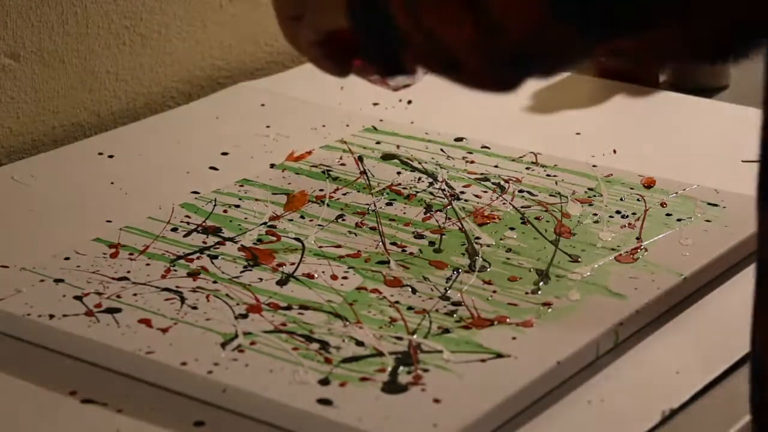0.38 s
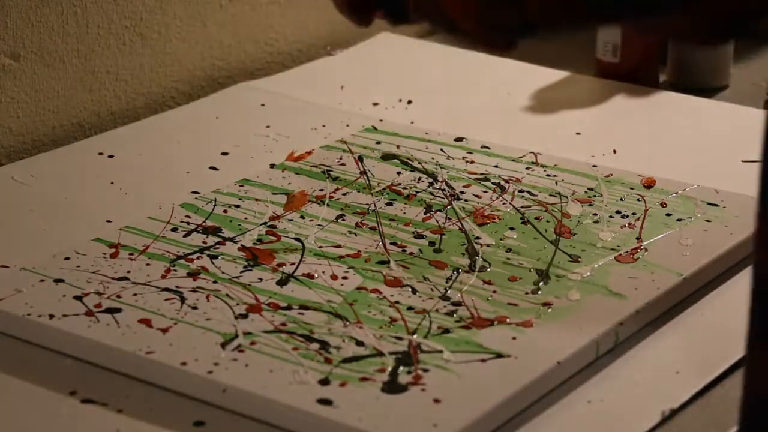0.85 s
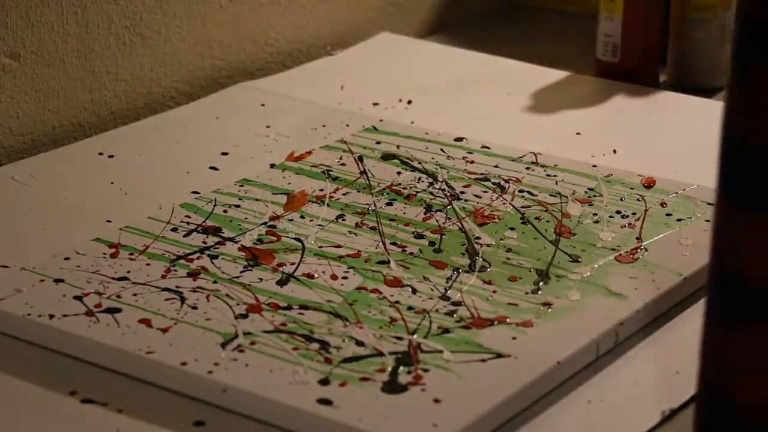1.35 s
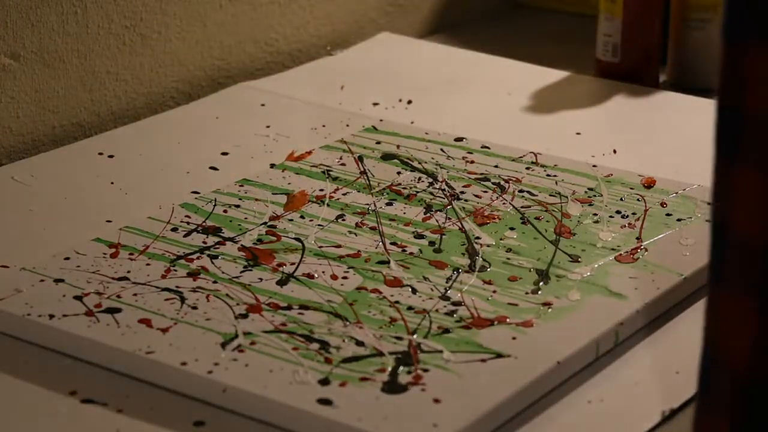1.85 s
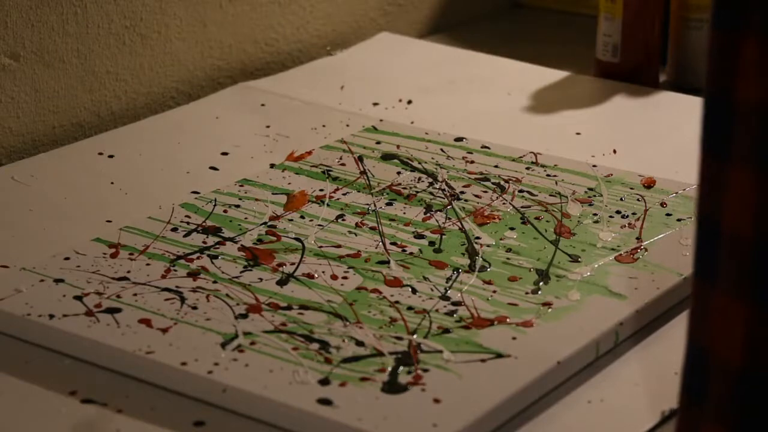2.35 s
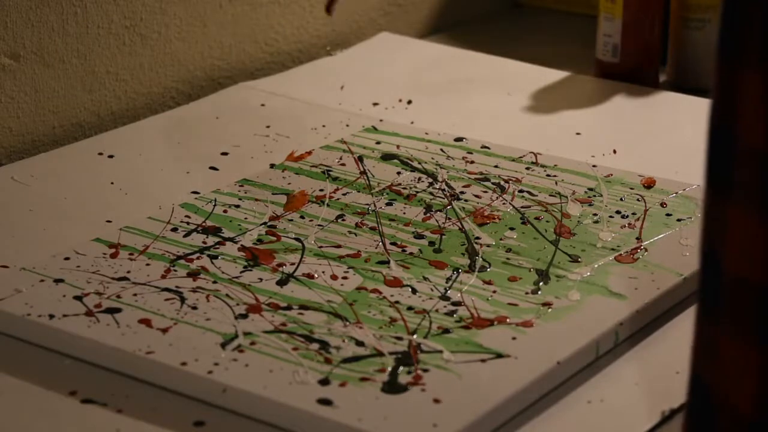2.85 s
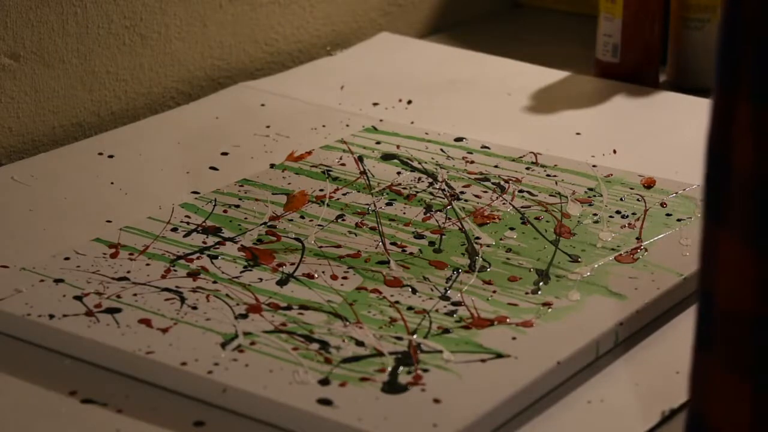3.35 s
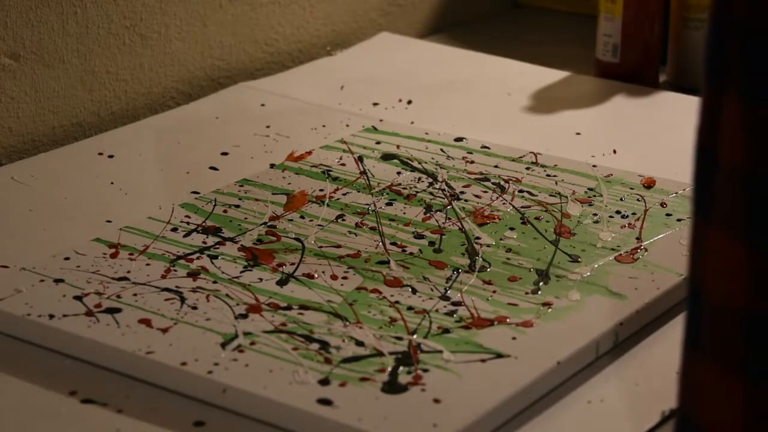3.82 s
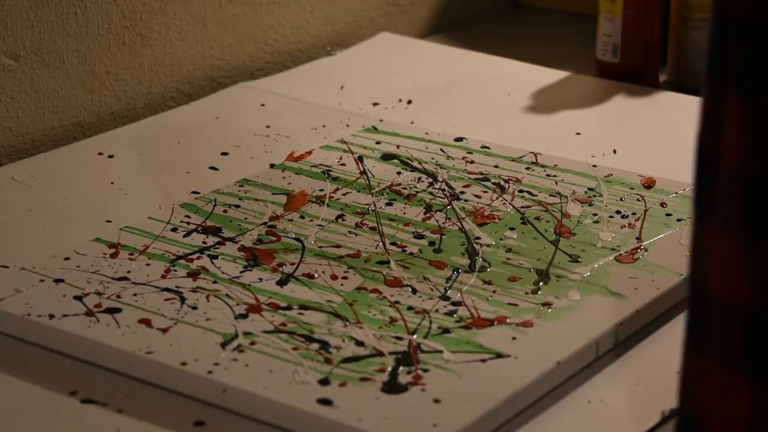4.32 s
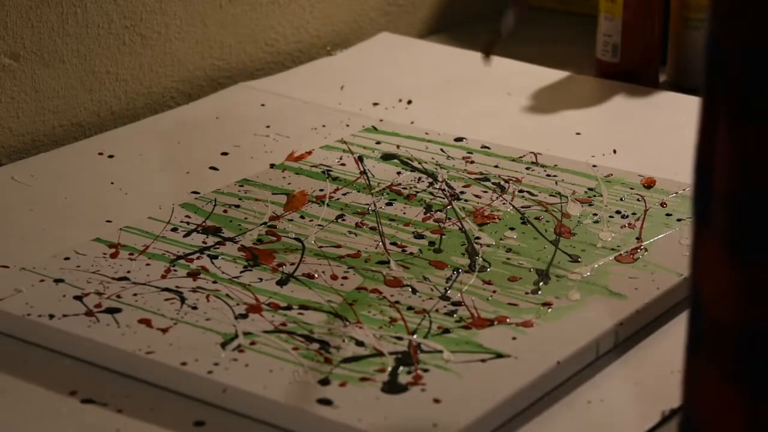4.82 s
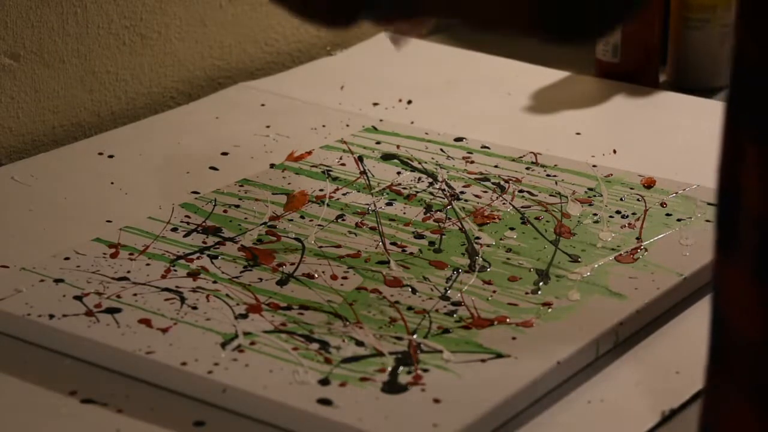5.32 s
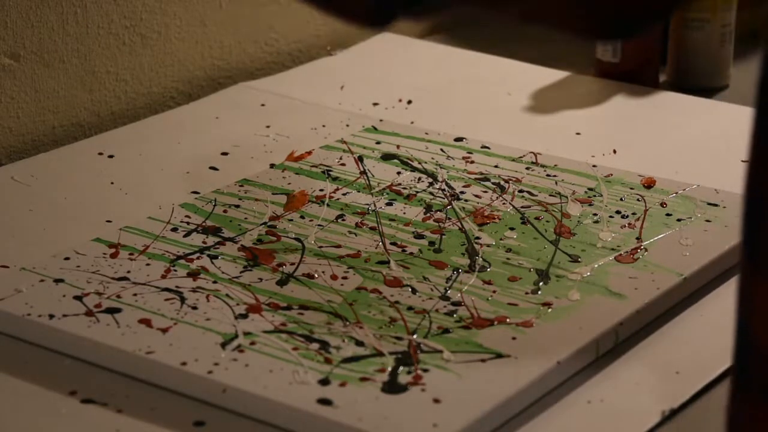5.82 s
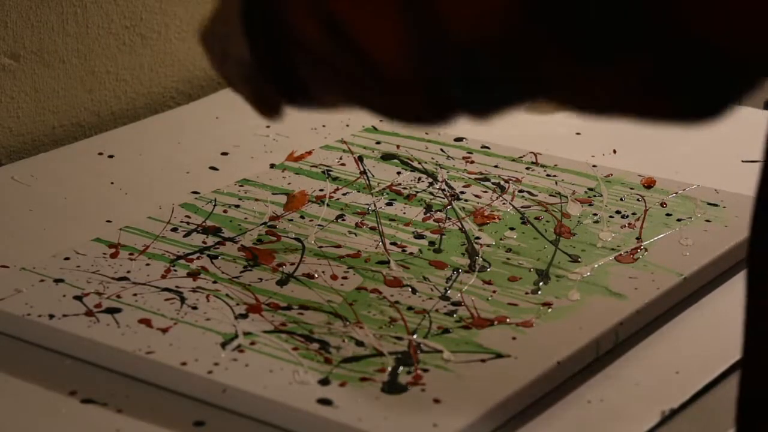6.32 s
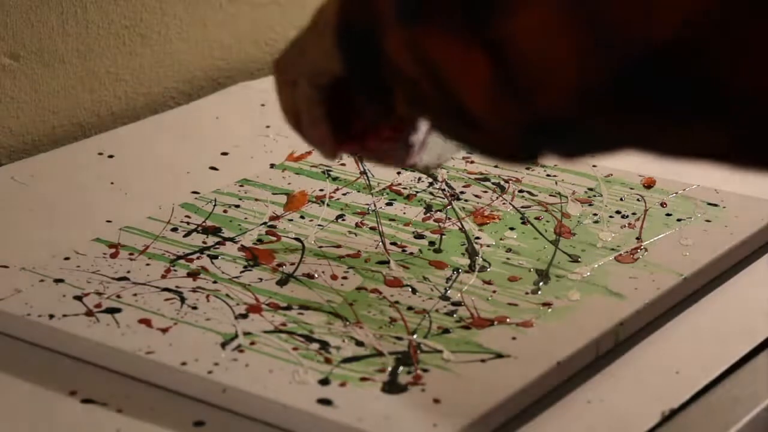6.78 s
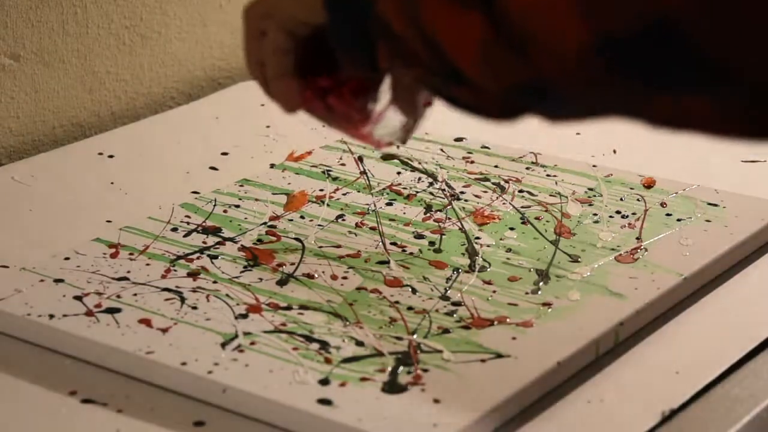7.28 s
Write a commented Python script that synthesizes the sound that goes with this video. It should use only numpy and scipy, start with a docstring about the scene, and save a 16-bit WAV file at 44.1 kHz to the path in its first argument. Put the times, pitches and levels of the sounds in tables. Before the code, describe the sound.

Light hollow plastic knocks and gritty scuffs come in clusters as bottles are handled on a tabletop, quiet gaps between, soft room air underneath.

```python
"""Plastic paint bottles and a stirring stick are picked up, knocked, twisted and slid on a table in a small quiet room.
Each contact rings the bottle walls, caps, hollow air and table top; rubbing is a dense stream of tiny contacts.
A short noise tail makes the room. Shaped noise makes room air, resonant noise a faint whirr and a low hum,
and one wavering sine a thin whistle."""
import sys
import numpy as np
from scipy import signal
from scipy.fft import rfft, irfft
from scipy.io import wavfile

SR = 44100
rng = np.random.default_rng(int(sys.argv[2]) if len(sys.argv) > 2 else 0)


def undo_db(level):
    """Turn decibels back into plain size, where 20 dB means ten times bigger."""
    steps = np.asarray(level, float) / 20
    return 10 ** steps


def file_out(sig):
    """Save sig as 16-bit WAV at sys.argv[1]."""
    # one column per channel
    cols = np.atleast_2d(sig).T
    # limit, then scale
    lim = np.clip(cols, -1, 1)
    pcm = np.round(lim * 32767).astype(np.int16)
    wavfile.write(sys.argv[1], SR, pcm)


N = 337806

# Steady room air spectrum. Each row: frequency in Hz, relative density in dB per Hz.
AIR_SPECTRUM = [(12, -68), (20, -20), (61, -9.5), (210, -1.5), (310, -6.5), (347, -6.5), (802, -7.5),
                (873, -8.5), (1030, -7.5), (1530, -10.5), (2260, -11), (11100, -23), (16000, -31.5)]
AIR_RMS_DB = -58.5

# Resonances of whirr and hum. Each row: frequency in Hz, width in Hz, relative level in dB.
WHIRR_MODES = [(1992, 56, -3.5), (2262, 14.6, 8.5), (2455, 41, -0.5), (2630, 150, -4.5), (2843, 37, -0.5),
               (3174, 37, -0.5)]
HUM_MODES = [(272, 24, 0), (303, 16, 1)]
# Levels of whirr and hum over time. Each row: time in seconds, rms level in dB.
WHIRR_LEVEL_DB = [(0, -62), (.6, -62.5), (2.1, -65.5), (2.4, -63), (3.3, -65.5), (4.05, -62), (4.45, -68.5),
                  (7.66, -69.5)]
HUM_LEVEL_DB = [(0, -73.5), (2.1, -74), (2.4, -76), (3.3, -71.5), (4.05, -76), (4.5, -71.5), (5.8, -69.5),
                (7.0, -64.5), (7.3, -61), (7.66, -61.5)]

# Resonances of bottle wall, shoulder and cap, hollow air and its neighbours, bright plastic edge, table top.
# Each row: frequency in Hz, width in Hz, relative level in dB.
WALL_MODES = [(1074, 195, -3), (1480, 250, -1.5), (1764, 154, 3.5), (1960, 246, 0.5), (2200, 130, 2),
              (2462, 172, 1), (2721, 130, -2), (2970, 75, -2.5)]
CAP_MODES = [(3460, 244, -4.5), (3844, 205, -2.5), (4196, 170, -1), (4410, 190, -2.5), (4753, 144, -3),
             (5150, 170, -3.5)]
HOLLOW_MODES = [(634, 177, -9.5), (729, 80, -1.5), (801.7, 37.4, 4), (931, 36, -2.5)]
TREBLE_MODES = [(5860, 790, -2), (6970, 770, 0.5), (8310, 2150, -3), (10170, 990, -2), (10940, 1500, -7.5),
                (13800, 2200, -14)]
TABLE_MODES = [(264, 123, -10), (336, 30, -3), (422, 93, 2), (490, 158, 2.5)]

# Scuffs start at once, hold, then die away. Each row: start in seconds, hold in seconds, wall rms level in dB,
# treble in dB re wall, hollow in dB re wall.
SCUFFS = [(0.506, 0.011, -42, 6.5, 1), (0.521, 0.035, -28.5, 1, -10.5), (0.57, 0.04, -27, 2, -13),
          (0.675, 0.0073, -39, 9, -10), (0.848, 0.017, -42.5, -7, -12), (1.157, 0.0035, -43.5, 3, 8.5),
          (1.354, .01, -56.5, 6, 2), (1.436, .006, -56.5, 1, 2), (1.261, .015, -39.5, -2, 3.5),
          (1.348, 0.12, -57, -4.5, 0), (1.49, 0.037, -47.5, -9, 8), (1.547, 0.014, -48, -1, 5),
          (1.617, 0.11, -62.5, 2.5, -4), (1.756, .02, -33, -3, 2), (1.918, 0.012, -47, 0, 5),
          (2.281, .015, -57.5, -25, -6), (3.229, 0.0099, -43, 0, 0), (3.58, 0.1, -60, -2.5, -2),
          (3.705, 0.024, -49.5, -3.5, -2), (3.745, 0.058, -56, -7.5, -1), (3.823, 0.088, -55.5, -1, -2),
          (4.085, 0.15, -53.5, -2.5, 1), (4.182, 0.11, -49, -2.5, -5.5), (4.711, .02, -57.5, -18, -4),
          (4.847, 0.011, -56, -8, 6), (5.761, 0.038, -61.5, -2.5, 4), (5.897, 0.014, -44, -4.5, -3),
          (6.088, 0.035, -47, -5, 1.5), (6.129, 0.029, -47.5, -2, -11), (6.188, 0.019, -43.5, -6.5, -8),
          (6.22, 0.031, -44, -3.5, -6), (6.351, .002, -42.5, -9, 1.5), (6.368, 0.026, -33.5, -1, -3),
          (6.596, 0.022, -46, -6, -1), (6.619, 0.01, -36.5, 1, 6), (6.448, .03, -53, -10, 1),
          (6.688, 0.048, -54, 3, 0), (6.75, 0.027, -46.5, -1.5, 2.5), (6.905, 0.0049, -43.5, 1.5, 5)]
# Slides swell to their height, then die away. Each row: time of the height in seconds, swell in seconds (half
# the rise), wall rms level in dB at the height, treble in dB re wall, hollow in dB re wall.
SLIDES = [(1.125, 0.031, -50.5, 5, -5), (1.155, 0.046, -50, 8, 2), (1.9, 0.037, -53, 11, -5),
          (2.16, 0.066, -63, 6.5, -1), (3.531, 0.14, -57.5, 4.5, -1), (3.99, 0.067, -54, 3.5, -3.5),
          (4.085, 0.041, -51.5, 2.5, -3), (4.29, 0.072, -49, 3.5, -14), (5.89, 0.062, -55, -1.5, 8),
          (6.015, 0.036, -49, 2.5, 0), (6.042, .03, -45, 4, -7), (6.29, 0.08, -53, 11, 0),
          (6.74, .03, -54, 11, 3.5), (7.01, 0.059, -48, 2.5, -7), (7.07, 0.094, -58, 5.5, -0.5)]
# Stroke shape, before the factors of STROKE_STEEPNESS: rise per swell time, falls.
SWELL_DB, SCUFF_FALL_DB_PER_S, SLIDE_FALL_DB_PER_S = 12.5, 261, 279
# Factor on the stroke shape in dB for each part. In order: wall, cap, hollow, treble, table.
STROKE_STEEPNESS = [1.18, 1.07, 1.1, 1.47, 0.93]
GRAINS_PER_S, GRAIN_SPREAD_DB = 5500, 2.4

# Knocks. Each row: time in seconds, wall peak level in dB, treble in dB re wall, hollow in dB re wall,
# table in dB re wall.
KNOCKS = [(0.5108, -23, -4, -14, -11), (0.5197, -22, -16, -16, -31), (0.5333, -19, 9, -27, -29),
          (0.555, -18, -7, -6, -21), (0.5874, -31, 0, -20, -22), (0.604, -26, 14, -22, -34),
          (0.6744, -25.5, -2, -20, -21), (0.7003, -29, 4, -7.5, -31), (0.8595, -32, -22, -11, -36),
          (1.0774, -48.5, -8, -1, 4), (1.1580, -28, 2, -4, 1), (1.2603, -31.5, -7, -3, -24),
          (1.267, -32.5, 0, 0, -15), (1.3553, -39, -1, -6, -18), (1.4399, -38, -3, 0, -13),
          (1.495, -29, -25, -7, -29), (1.5135, -34.5, -15, 6.5, -20), (1.5526, -31.5, -1, -3.5, -25),
          (1.7459, -25.5, -11, -5.5, -23), (1.7516, -16, 2, -16, -26), (1.7537, -21, 17, -4, -20),
          (1.9099, -33.5, -1, 1, -1.5), (3.2311, -29.5, -3, -21, -36), (3.2444, -31, 6.5, -13, -39),
          (3.7044, -43, -12, -3.5, -18), (3.8244, -35, -8, -4, -8), (4.1951, -36, -12, -12, -20),
          (4.7227, -48, -20, -6, -5), (4.8544, -41, -4, -6, -14), (5.7644, -55, -10, 4, -5),
          (5.805, -45, -14, -11, -15), (5.903, -34, -20, -18, -14), (6.0332, -32, -8, -23, -10),
          (6.1015, -37.5, -16, -3, -5.5), (6.111, -36, -14, 1, -12), (6.1298, -39, -3, -11, -17),
          (6.2032, -31, -7, -18, -14), (6.3470, -19, -15, -14, -26), (6.3493, -14.5, -13, -17.5, -25),
          (6.3699, -27, -2, -11, -22), (6.392, -26, 6, -14, -14.5), (6.5234, -49, -20, -9, 7),
          (6.5942, -39, -9, -0.5, -10), (6.6196, -17, 3.5, -1.5, -20), (6.6235, -24, 9.5, 6.5, -8),
          (6.7488, -37, -12, 9, 1), (6.7815, -35, 4, 4.5, 1), (6.9067, -31, 4, -18, -13),
          (6.9712, -41, -5, -4.5, -5), (7.0369, -40, -7, -17, -1)]
CHATTER_MS, CHATTER_DB = 3.16, -22  # decay time constant, initial rms re the touch

# Cap level re wall, plus its share of the treble's level in dB; table level re wall in rubbing.
CAP_KNOCK_DB, CAP_KNOCK_SHARE, CAP_RUB_DB, CAP_RUB_SHARE = -1, 0.33, -1.03, 0.53
TABLE_RUB_DB = -14.5
GRIP_DB, TREBLE_GRIP_DB, MODE_WANDER_PER_S = 3, 1.26, 40.0  # mode wander: spreads, rate

ROOM_T60_S, ROOM_TREBLE_T60_S, ROOM_DB = 0.36, 0.29, -9.5

# Thin whistle. Each row: time in seconds, mean pitch in Hz, rms level in dB.
WHISTLE = [(1.98, 3470, -85), (2.02, 3480, -72), (2.4, 3450, -74.5), (2.7, 3500, -75), (2.84, 3540, -85),
           (2.87, 3720, -66), (2.94, 3420, -67), (3.02, 3330, -74)]


def rms_one(x):
    """Scale to rms 1."""
    return x / np.sqrt(np.mean(x ** 2) + 1e-20)


def in_time(rows, outside=None):
    """Columns of a table joined by straight lines, one value a sample."""
    s, *columns = np.transpose(rows)
    t = np.arange(N) / SR
    return np.array([np.interp(t, s, column, outside, outside) for column in columns])


def wander(spread_db, per_s):
    """A gain that wanders at random by spread_db around a mean power of about 1."""
    knots = undo_db(spread_db * rng.standard_normal(int(N / SR * per_s) + 3))
    return np.interp(np.arange(N) * per_s / SR, np.arange(len(knots)), rms_one(knots))


def resonate(steady, modes, shift_db, taps=0):
    """Parallel resonances with alternating signs, each fed with a strength that wanders.
    Steady noise keeps its rms, a single tap keeps its peak."""
    filters = []
    for k, (hz, width_hz, level_db) in enumerate(modes):
        r = np.exp(-np.pi * width_hz / SR)  # pole radius
        gain = (-1) ** k * undo_db(level_db) * (1 - r * r) / 2
        poles = [1, -2 * r * np.cos(2 * np.pi * hz / SR), r * r]
        filters.append((gain * np.array([1, 0, -1]), poles))
    click = signal.unit_impulse(SR // 8) + 1e-18
    reply = sum(signal.lfilter(b, a, click) for b, a in filters)
    force = steady / np.sqrt(np.sum(reply ** 2)) + taps / np.max(np.abs(reply))
    force = force + 1e-18  # keeps the filters out of denormals
    return sum(signal.lfilter(b, a, force * wander(shift_db, MODE_WANDER_PER_S)) for b, a in filters)


def air():
    """Steady room air and hiss: Gaussian noise shaped in frequency."""
    hz, level_db = np.transpose(AIR_SPECTRUM)
    log_hz = np.log(np.fft.rfftfreq(N, 1 / SR) + 1)
    shape = undo_db(np.interp(log_hz, np.log(hz), level_db))
    noise = irfft(rfft(rng.standard_normal(N)) * shape, N)
    return undo_db(AIR_RMS_DB) * rms_one(noise)


def whirr():
    """Faint wavering whirr: noise in narrow resonances."""
    return undo_db(in_time(WHIRR_LEVEL_DB)[0]) * resonate(rng.standard_normal(N), WHIRR_MODES, shift_db=1.3)


def hum():
    """Low hum: noise in two low resonances."""
    return undo_db(in_time(HUM_LEVEL_DB)[0]) * resonate(rng.standard_normal(N), HUM_MODES, shift_db=1.5)


def grains(per_s, spread_db):
    """Tiny contacts at random moments, a few much larger than the rest; rms 1."""
    sizes = undo_db(spread_db * np.minimum(rng.exponential(1, N), 5)) * rng.choice([-1, 1], N)
    return rms_one(sizes * (rng.random(N) < per_s / SR))


def part_gains(wall_db, treble_db, hollow_db, table_db, cap_db, share):
    """Gains of wall, cap, hollow, treble and table, as a column; the cap takes a share of the brightness."""
    re_wall_db = np.array([0, cap_db + share * treble_db, hollow_db, treble_db, table_db])
    return undo_db(wall_db + re_wall_db)[:, None]


def rubbing():
    """Dense grains, unsteady as surfaces catch and slip; the table takes up a little of the wall's motion."""
    power = np.zeros((5, N + SR))
    t = np.arange(SR // 2) / SR
    strokes = []
    for s, hold_s, *levels_db in SCUFFS:
        shape_db = -SCUFF_FALL_DB_PER_S * np.maximum(t - hold_s, 0)
        strokes.append((s, shape_db, levels_db))
    for s, swell_s, *levels_db in SLIDES:
        rise_db = SWELL_DB * (t / swell_s - 2)
        fall_db = -SLIDE_FALL_DB_PER_S * (t - 2 * swell_s)
        strokes.append((s - 2 * swell_s, np.minimum(rise_db, fall_db), levels_db))
    for s, shape_db, levels_db in strokes:
        at = round(s * SR)
        gains = part_gains(*levels_db, TABLE_RUB_DB, CAP_RUB_DB, CAP_RUB_SHARE)
        envelopes = gains * undo_db(np.outer(STROKE_STEEPNESS, shape_db))
        power[:, at:at + len(t)] += envelopes ** 2
    return np.sqrt(power[:, :N]) * wander(1.34, per_s=98.0) * grains(GRAINS_PER_S, GRAIN_SPREAD_DB)


def knocks():
    """Each knock is one sharp touch and a chatter that dies; rows wall, cap, hollow, treble, table."""
    out = np.zeros((5, N))
    t_ms = np.arange(SR // 16) * 1000 / SR
    decay = np.exp(-t_ms / CHATTER_MS)
    chatter = grains(3000, spread_db=4.0)
    for s, *levels_db in KNOCKS:
        at = round(s * SR)
        force = undo_db(CHATTER_DB) * decay * chatter[at:at + len(t_ms)]
        force[0] += 1
        out[:, at:at + len(t_ms)] += part_gains(*levels_db, CAP_KNOCK_DB, CAP_KNOCK_SHARE) * force
    return out


def bottles():
    """Rubs and knocks excite every part; as grip and contact point move, the modes trade strength."""
    modes = (WALL_MODES, CAP_MODES, HOLLOW_MODES, TREBLE_MODES, TABLE_MODES)
    grips_db = (GRIP_DB, GRIP_DB, GRIP_DB, TREBLE_GRIP_DB, GRIP_DB)
    parts = zip(rubbing(), knocks(), modes, grips_db)
    return sum(resonate(rub, part, grip_db, taps) for rub, taps, part, grip_db in parts)


def room(x):
    """A dense tail of reflections, starting after 3 ms, the treble dying sooner."""
    t = np.arange(SR // 2) / SR
    noise = rng.standard_normal(len(t)) * (t > .003)
    low = signal.lfilter(*signal.butter(1, 3500, fs=SR), noise)
    tail = low * undo_db(-60 * t / ROOM_T60_S) + (noise - low) * undo_db(-60 * t / ROOM_TREBLE_T60_S)
    return undo_db(ROOM_DB) * signal.fftconvolve(x, tail / np.sqrt(np.sum(tail ** 2)))[:N]


def whistle():
    """Thin whistle: a sine of wavering pitch and level that ends in a falling squeak."""
    pitch_hz, level_db = in_time(WHISTLE, outside=-120)  # silent outside the table
    phase = 2 * np.pi * np.cumsum(pitch_hz * wander(0.031, per_s=49.0)) / SR
    return np.sqrt(2) * undo_db(level_db) * wander(2.4, per_s=30.0) * np.sin(phase)


def scene():
    """Bottles in the room over air, whirr, hum and whistle; one channel."""
    near = bottles()
    background = air() + whirr() + hum() + whistle()
    return (near + room(near) + background)[None]


def top_cut(x):
    """Nothing passes above the cut-off."""
    return signal.sosfilt(signal.butter(12, 16460, fs=SR, output="sos"), x)


def record(dry):
    """Deliver the finished mix."""
    return top_cut(dry)


dry = scene()
out = record(dry)
file_out(out)
```